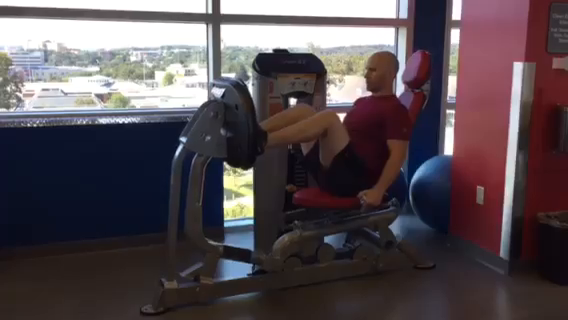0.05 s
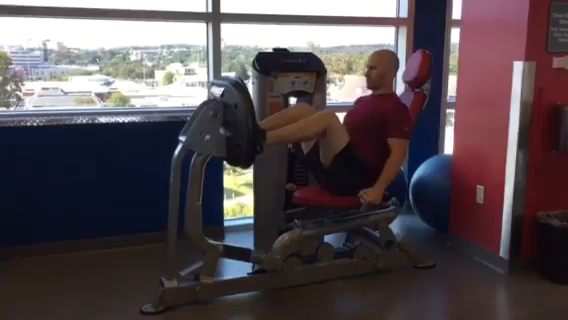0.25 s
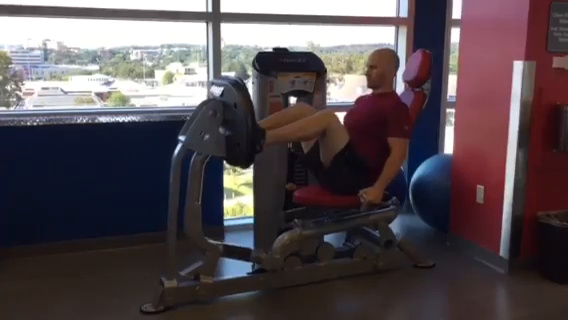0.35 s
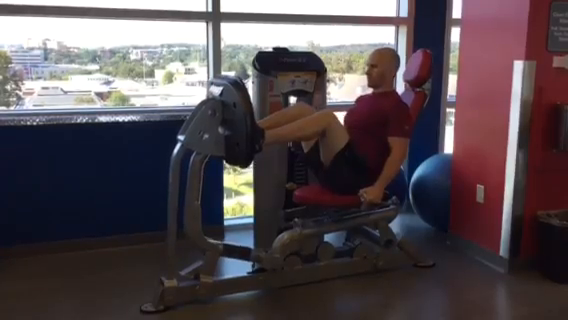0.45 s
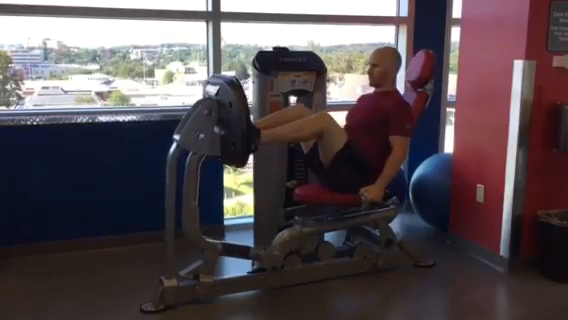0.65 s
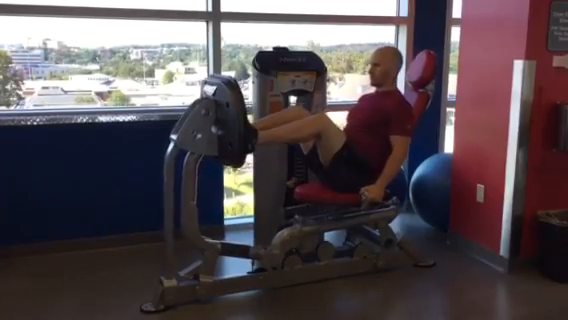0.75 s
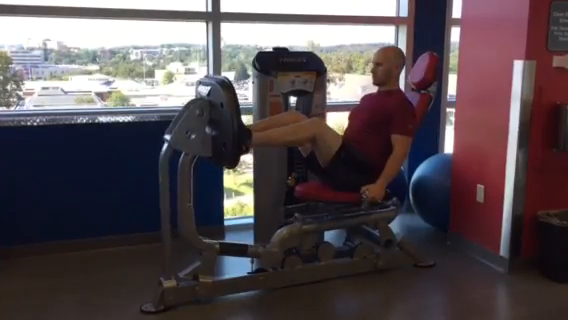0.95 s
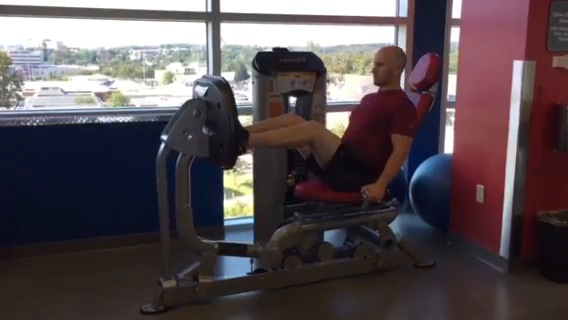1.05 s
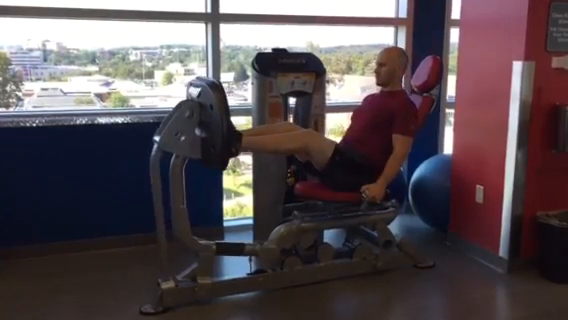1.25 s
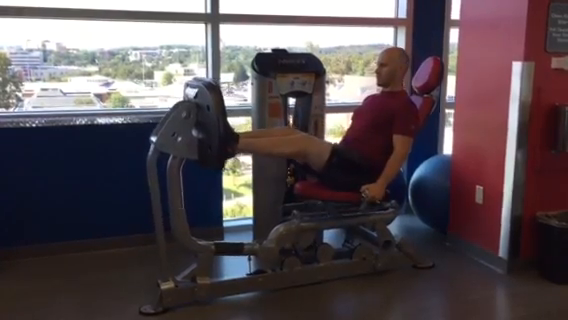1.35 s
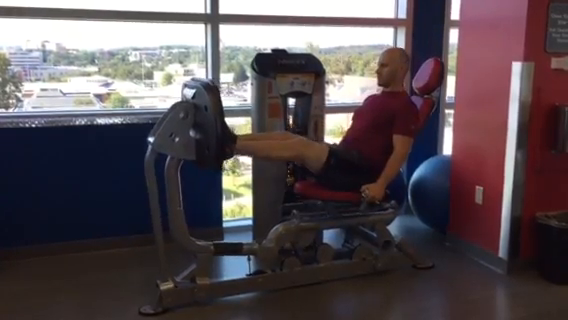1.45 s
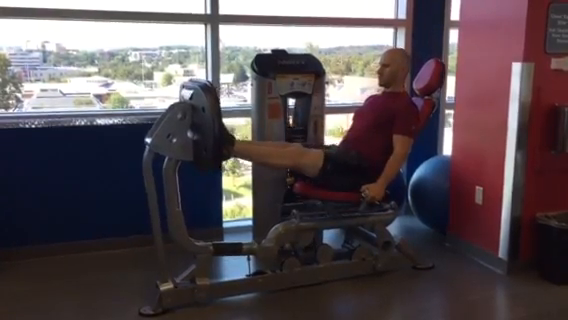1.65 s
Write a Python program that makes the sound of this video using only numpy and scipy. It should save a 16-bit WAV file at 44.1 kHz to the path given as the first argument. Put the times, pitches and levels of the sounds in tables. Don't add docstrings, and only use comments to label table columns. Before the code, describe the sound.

A weight stack clanks sharply in a hard-walled gym. After a sliver of silence, low ventilation rumble and thin hiss begin. At 0.2 s a light graze leads straight into a bright steel crack with tiny bounces, high beating ring, rattling rods and a deep floor boom. A dull rebound knock follows near 0.4 s; echoes fade, with soft thumps until 1.1 s and faint creaks around 1.65 s.

```python
import sys
import numpy as np
from scipy import signal
from scipy.fft import rfft, irfft
from scipy.io import wavfile
from scipy.ndimage import uniform_filter1d

SR = 44100
rng = np.random.default_rng(int(sys.argv[2]) if len(sys.argv) > 2 else 0)


def natural_amplitude(level_db):
    exponent = np.asarray(level_db, float) / 20
    return 10 ** exponent


def materialize(psi):
    bounded = np.clip(np.atleast_2d(psi).T, -1, 1)
    quanta = np.round(bounded * 32767).astype(np.int16)
    wavfile.write(sys.argv[1], SR, quanta)


N = 74970


def evened(x):
    return x / np.sqrt(np.mean(x ** 2) + 1e-20)


def read(points, hz):
    f, value = np.transpose(points)
    return np.interp(np.log(hz + 1), np.log(f + 1), value)


def since(s):
    return np.maximum(np.arange(N) / SR - s, 0)


def air(shape_db, patch_db, swell_db):
    frames = N // 256 + 9
    real, imag, patches = rng.standard_normal((frames, 1025, 3)).T
    patches = uniform_filter1d(patches, size=6, axis=0)
    patches = evened(uniform_filter1d(patches, size=12, axis=1))
    swell = evened(uniform_filter1d(rng.standard_normal(frames), size=14))
    level_db = shape_db[:, None] + patch_db * patches + swell_db * swell
    spectrum = (real + 1j * imag) * natural_amplitude(level_db)
    return evened(signal.istft(spectrum, nperseg=2048, noverlap=1792)[1][:N])


def ventilation():
    # (frequency [Hz], level [dB per Hz])
    rumble_colour = [(25, -39), (40, -26.5), (55, -4.5), (115, 0), (185, -2.5), (270, -10), (420, -21.5),
                     (560, -36)]
    # (frequency [Hz], level [dB per Hz])
    hiss_colour = [(260, -32), (450, -1.5), (508, -11), (599, -1.5), (810, -6), (2360, -13), (12000, -30.5),
                   (15300, -30), (16500, -51)]
    # (frequency [Hz], width [Hz])
    ducts = [(58, 8), (118, 10), (178, 14), (205, 10), (260, 10), (410, 12)]
    rumble_db, hiss_db, duct_db = -46.5, -67, 3.5
    hz = np.fft.rfftfreq(2048, 1 / SR)
    peaks = sum(duct_db * np.exp(-((hz - f) / width) ** 2) for f, width in ducts)
    low = read(rumble_colour, hz) - 100 * (hz > 700) + peaks * 0
    rumble = natural_amplitude(rumble_db) * air(low, patch_db=1.5, swell_db=-0.48)
    hiss = natural_amplitude(hiss_db) * air(read(hiss_colour, hz), patch_db=1.0, swell_db=0.098)
    return rumble + hiss


def swells(waves):
    t, out = np.arange(N) / SR, np.zeros(N)
    for crest, db, hz, rise, fall in waves:
        shape = np.exp(-((t - crest) / np.where(t < crest, rise, fall)) ** 2)
        out += natural_amplitude(db) * shape * np.cos(2 * np.pi * hz * (t - crest))
    return out


def footfalls_and_creaks():
    # (crest [s], level [dB], frequency [Hz], rise [s], fall [s])
    thumps = [
        (0.249, -43, 55.5, 0.024, .08),
        (0.504, -47, 84, 0.019, 0.05),
        (.53, -41, 167, 0.022, 0.014),
        (0.586, -47, 161, 0.014, 0.013),
        (.645, -43, 177, 0.0063, 0.021),
        (0.737, -41.5, 177.7, 0.021, 0.02),
        (1.058, -35, 133, 0.0028, 0.013),
        (1.65, -62, 672, 0.013, 0.013),
        (1.671, -62, 1430, .005, .014),
        (1.685, -56.5, 476, 0.013, 0.023),
    ]
    return swells(thumps)


def floor_boom():
    # (crest [s], level [dB], frequency [Hz], rise [s], fall [s])
    boom_waves = [
        (0.243, -26, 78, 0.024, 0.036),
        (.242, -23.5, 159.7, 0.013, .028),
        (0.261, -38, 200.7, .035, 0.05),
        (0.301, -35, 168, 0.013, 0.0133),
        (0.314, -32, 124, 0.039, 0.032),
        (.337, -31.5, 88.4, 0.032, 0.064),
        (0.369, -33.5, 121.2, 0.013, 0.021),
        (0.387, -32, 85.3, 0.014, 0.034),
        (0.426, -44, 118, 0.023, 0.038),
        (.45, -44, 200.8, 0.071, 0.074),
    ]
    return swells(boom_waves)


def knocks():
    # (level [dB], frequency [Hz], time to fall 60 dB [s])
    bumps = [
        (-49.5, 1520, 0.24),
        (-53.5, 3600, 0.057),
        (-67.5, 1300, .4),
        (-68, 520, 0.82),
        (-55, 6600, 0.13),
        (-55.5, 740, 0.48),
    ]
    bump_times = [.388, .389, 1.664, 1.63, .1985, .389]
    out = np.zeros(N)
    noises = rng.standard_normal((len(bumps), N))
    for s, (db, hz, t60), noise in zip(bump_times, bumps, noises):
        resonance = signal.butter(2, [hz * 0.78, hz * 1.15], "band", fs=SR, output="sos")
        band = evened(signal.sosfilt(resonance, noise))
        rise = np.minimum(since(s) / 0.0063, 1)
        out += band * rise * natural_amplitude(db - 60 * since(s) / t60)
    return out


def shudder(modes):
    t, out = since(0.2072), np.zeros(N)
    for (hz, width, db, rise, t60), noise in zip(modes, rng.standard_normal((len(modes), N))):
        peak = signal.iirpeak(hz, hz / (1.5 * width), SR)
        band = evened(signal.lfilter(*peak, signal.lfilter(*peak, noise)))
        build_up = 1 - np.exp(-(t / rise) ** 2)
        out += band * natural_amplitude(db - 60 * (t - rise) / t60) * build_up
    return out


def frame():
    # (frequency [Hz], width [Hz], level [dB], build-up [s], time to fall 60 dB [s])
    frame_modes = [(296, 79, -46, 0.027, 0.63), (342, 23.7, -38.5, 0.046, 0.72),
                   (411, 13, -47, 0.021, 0.86), (462.5, 12, -38.5, 0.03, 0.57),
                   (567, 103, -44.5, 0.044, 0.39), (612, 28, -48.5, 0.046, 0.7), (689, 20, -49, 0.13, 0.33),
                   (796, 31, -43.5, 0.026, 0.37), (263, 42, -44, 0.068, 0.85), (2100, 10, -60, 0.018, 0.77)]
    return shudder(frame_modes)


def rattle():
    # (frequency [Hz], width [Hz], level [dB], build-up [s], time to fall 60 dB [s])
    rattle_modes = [(996, 84, -40, 0.0088, 0.33), (1089, 86, -42, 0.012, 0.47),
                    (1335, 270, -37.5, 0.0019, 0.27), (3810, 320, -47, .003, 0.3),
                    (4700, 230, -47, .003, 0.093), (6230, 230, -47, 0.0017, 0.19),
                    (6460, 110, -56, 0.0074, 0.64), (7150, 90, -54, 0.0019, 0.49),
                    (8260, 200, -64, .003, 0.18), (9400, 650, -41.5, 0.0023, 0.11),
                    (10770, 120, -70, .003, 0.18), (11600, 120, -48, 0.0022, 0.26),
                    (12840, 560, -40, .002, 0.11), (12940, 260, -52, .003, 0.22)]
    return shudder(rattle_modes)


def hall():
    # (frequency [Hz], time to fall 60 dB [s])
    echo_times = [(200, 1), (700, 0.95), (1500, 0.66), (3000, 0.43), (6000, 0.38), (11000, 0.31),
                  (16000, 0.28)]
    taps = np.zeros(SR)
    at = np.arange(40, SR - 20, 10)
    taps[at + rng.integers(0, 10, len(at))] = rng.choice([-1., 1.], len(at))
    hz, t, z = signal.stft(taps, SR, nperseg=256)
    decay = natural_amplitude(-60 * t / read(echo_times, hz)[:, None])
    tail = signal.istft(z * decay, SR, nperseg=256)[1]
    rise_s = 0.0027
    tail = tail * (1 - np.exp(-np.arange(len(tail)) / SR / rise_s))
    return tail / np.linalg.norm(tail)


def crack():
    # (time [s], level [dB])
    blows = [
        (.1986, -27),
        (.2062, -14),
        (.2078, 0),
        (.2125, -12),
        (.2160, -10),
        (.2335, -16),
    ]
    # (frequency [Hz], level [dB])
    crack_colour = [(400, -53), (900, -4.5), (1400, -1.5), (2300, -11.5), (5200, -9), (7000, -8.5),
                    (12500, -5), (15800, -17), (16600, -35)]
    level_db, decay_s = -25, 0.00062
    gain = natural_amplitude(read(crack_colour, np.fft.rfftfreq(N, 1 / SR)))
    noise = evened(irfft(rfft(rng.standard_normal(N)) * gain, N))
    bursts = np.zeros(N)
    for s, db in blows:
        bursts += natural_amplitude(level_db + db) * (since(s) > 0) * np.exp(-since(s) / decay_s)
    return noise * bursts


def ring(s, hz, db, t60):
    return natural_amplitude(db - 60 * since(s) / t60) * np.sin(2 * np.pi * hz * since(s))


def tick():
    # (time [s], frequency [Hz], level [dB], time to fall 60 dB [s])
    tick_mode = (.2078, 12500, -22, .004)
    return ring(*tick_mode)


def plates():
    # (time [s], level [dB])
    landing = [
        (.2000, -19),
        (.2085, 0),
    ]
    # (frequency [Hz], level [dB], time to fall 60 dB [s], direction of first swing [+1 or -1])
    plate_modes = [(2962, -6, .11, 1), (3024, 0, .09, 1), (3048, -9, .4, -1), (3061, -14, .45, -1),
                   (3071, -5, .33, -1), (3087, -1, .19, -1), (3110, -1, .14, 1), (3162, -10, .22, 1),
                   (3200, 4, .06, 1), (3768, -17, .28, 1), (4795, -28, .55, 1), (4800, -26, .55, 1),
                   (6537, -14, .25, 1), (6568, -15, .42, -1)]
    plate_db, rise_s = -34.5, 0.00077
    out = np.zeros(N)
    for s, level in landing:
        tones = sum(np.sign(side) * ring(s, hz, db, t60) for hz, db, t60, side in plate_modes)
        out += natural_amplitude(plate_db + level) * (1 - np.exp(-since(s) / rise_s)) * tones
    return out


def scene():
    steel, snap = plates(), crack()
    sent_to_walls = natural_amplitude(-13) * steel + natural_amplitude(-6) * 4 * snap
    echoes = signal.fftconvolve(sent_to_walls, hall())[:N]
    clank = steel + snap + tick() + echoes
    structure = knocks() + floor_boom() + frame() + rattle()
    return (clank + structure + footfalls_and_creaks() + ventilation())[None]


def top_cut(x):
    return signal.sosfilt(signal.butter(12, 16640, fs=SR, output="sos"), x)


def record(dry):
    lowpass = signal.firwin(511, 16050, window=("kaiser", 9), fs=SR)
    x = signal.oaconvolve(dry, lowpass[None], "same")
    open_s, step_db, decay_s = .0341, -41, 0.0011
    t = since(open_s)
    step = np.exp(-t / decay_s)
    x = (x * (1 - step) + natural_amplitude(step_db) * step) * (t > 0)
    return top_cut(x)


dry = scene()
out = record(dry)
materialize(out)
```